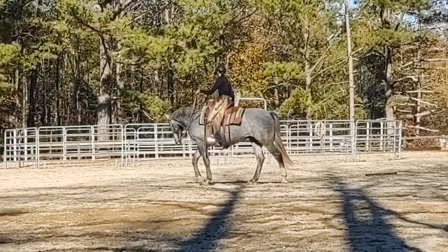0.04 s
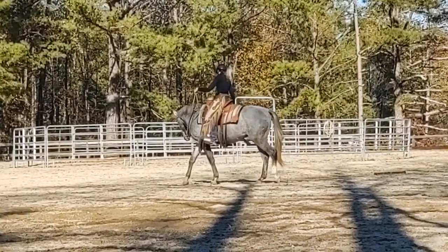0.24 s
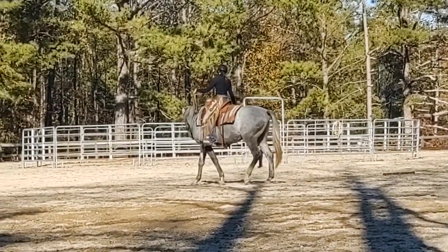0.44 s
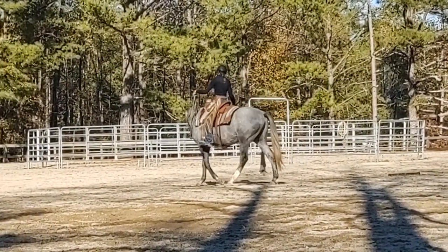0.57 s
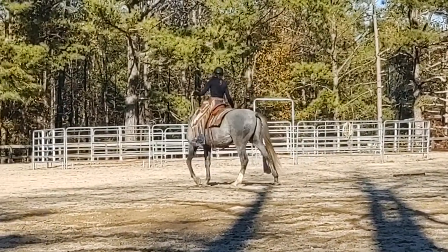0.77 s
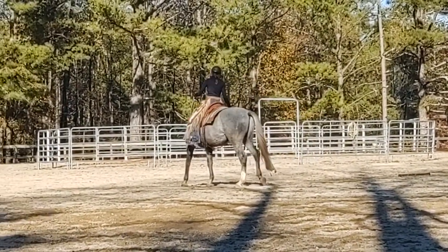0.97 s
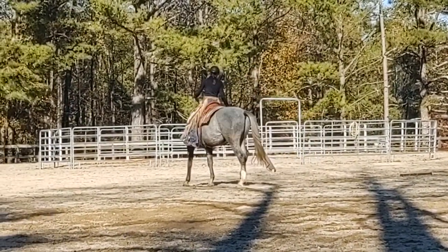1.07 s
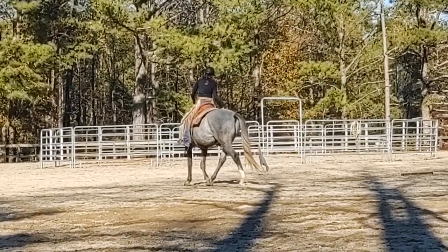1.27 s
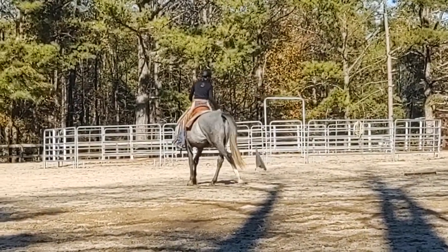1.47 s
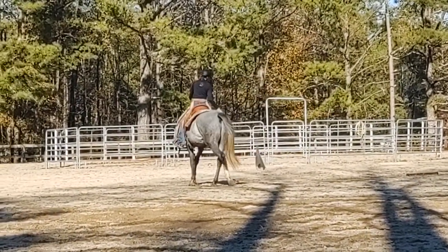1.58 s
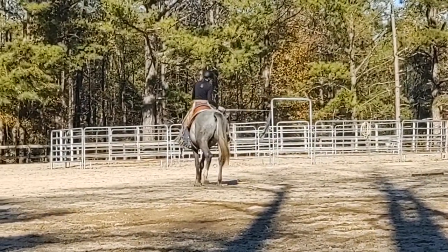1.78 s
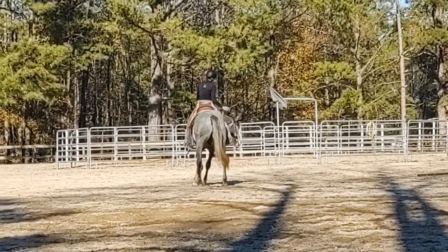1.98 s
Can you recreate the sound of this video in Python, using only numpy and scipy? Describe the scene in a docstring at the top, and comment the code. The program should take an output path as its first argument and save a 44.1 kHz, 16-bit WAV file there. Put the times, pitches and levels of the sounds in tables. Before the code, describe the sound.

Soft, low, irregular wind thumps buffet the left microphone throughout, strongest around 0.85-1.0 and 1.53 seconds, fading after 1.8. A distant engine hum slides down in pitch, loudest near 1.0-1.2, with faint roar and low rumble. Tack ticks at 0.14; faint sand scuffs come mostly before 0.5. A bird chips at 0.77, echoing in trees. Hoof knocks, right, at 0.87 and 1.37, the second clickier. Quiet leafy hiss.

```python
"""Soft low thumps of a light breeze on the left of two hand-held microphones, in a sandy outdoor arena.
An engine passes about 22 m off, its hum falling in pitch over a faint roar; a weak low rumble lies under it.
A hoof knocks twice, sand is scuffed, tack ticks, a bird chips once and the trees hiss softly.
Gusts and rumble are filtered random kicks, the hum a gliding sine with its octave, roar and hiss filtered
noise; knocks and tick are dying sines, scuffs grainy noise, the chip a rising sine with scattered echoes."""
import sys
import numpy as np
from scipy import signal
from scipy.io import wavfile
from scipy.ndimage import uniform_filter1d

SR = 44100
rng = np.random.default_rng(int(sys.argv[2]) if len(sys.argv) > 2 else 0)


def transcribe(u):
    """Save the signal u as a 16-bit wav file named by the first command-line argument.

    u: samples, shape (n,) or (channels, n), limited to [-1, 1]; the rate is SR.
    q: integer samples, one column per channel.
    """
    v = np.clip(np.atleast_2d(u).T, -1, 1)
    q = np.round(v * 32767).astype(np.int16)
    wavfile.write(sys.argv[1], SR, q)


N = 89478

# Gusts at the left microphone, before its port: [t/s, level/dB, upper over lower thump/dB]
GUSTS = [(0, -65.5, -17), (.06, -46.5, 3), (.085, -51.5, -10), (.097, -38.5, -6.5), (.127, -42.5, 8),
         (.168, -50.5, -1), (.19, -37, 11.5), (.23, -53, 0), (.27, -40, -2), (.3, -53.5, -27),
         (.36, -61, -11), (.44, -64, -19), (.47, -52, 1), (.49, -37.5, 5.5), (.515, -48, 7),
         (.535, -50, -9), (.62, -54.5, -12), (.67, -47, -1.5), (.72, -63.5, -14), (.745, -42, 0),
         (.78, -61.5, 32), (.838, -58, -6), (.85, -34.5, -2), (.885, -42.5, -3.5), (.92, -34, 3),
         (.965, -34.5, -2), (.98, -42.5, 4.5), (1.08, -47.5, -8), (1.11, -40, 2), (1.135, -48, 1),
         (1.18, -37, -2.5), (1.24, -59.5, 5), (1.31, -53.5, 4), (1.33, -45.5, -7), (1.36, -36, -18),
         (1.39, -51.5, -27), (1.435, -47, 5), (1.517, -49.5, -3), (1.528, -31.5, 1.5), (1.575, -40, -7.5),
         (1.6, -59, -4), (1.63, -43, -2), (1.67, -50.5, -11), (1.765, -52.5, -3), (1.782, -41, -5.5),
         (1.81, -73, 10), (2.03, -62.5, 2)]
# Gritty puffs on top of the sharpest gusts: [t/s, length/s, level/dB]
PUFFS = [(.18, 0.026, -66), (1.525, .07, -63.5)]
# Loudness of the engine's hum, wavering through the air: [t/s, level/dB]
HUM = [(0, -56), (.21, -53), (.3, -62), (.42, -60), (.56, -63), (.75, -56), (.88, -56), (.93, -56),
       (1.04, -48), (1.13, -51.5), (1.2, -48), (1.3, -54.5), (1.36, -49.5), (1.41, -55), (1.52, -54),
       (1.64, -62), (1.8, -64), (2.03, -71)]
# Roar of the passing engine: [t/s, level/dB]
ROAR = [(0, -72.5), (.6, -75), (.85, -75.5), (.95, -69), (1.2, -69), (1.3, -75.5), (1.6, -74.5),
        (2.03, -84.5)]
# Weak low rumble heard at both microphones, perhaps the distant engine: [t/s, level/dB]
RUMBLE = [(0, -64.5), (.12, -58.5), (.3, -63.5), (.45, -61.5), (.6, -72), (.75, -65.5), (.9, -59),
          (1.0, -63), (1.08, -55.5), (1.15, -56), (1.22, -59.5), (1.3, -58), (1.5, -63), (1.58, -54.5),
          (1.7, -60), (1.85, -61.5), (2.03, -68)]
# Hoof knocks at the right microphone: [t/s, thud level/dB, click level/dB]
KNOCKS = [(0.874, -49, -73), (1.3684, -53, -42)]
# Sand scuffs at the right microphone: [t/s, length/s, level/dB]
SCUFFS = [(.0, 0.049, -77.5), (0.146, 0.025, -70.5), (0.25, 0.029, -75), (0.372, 0.089, -72.5),
          (1.675, 0.024, -79)]
# Modes of the ticking tack: [f/Hz, left level/dB, right level/dB, t60/s]
TACK = [(2300, -67, -60, .015), (3300, -66, -63, .016), (4150, -58, -62, .015), (6950, -45, -43, .005),
        (10500, -47, -38, .004), (11800, -82, -72, .09), (10150, -79, -71, .1)]
# Spectrum of the hiss of trees and air, relative to AIR_DB: [f/Hz, left level/dB, right level/dB]
AIR = [(225, 2, 7.5), (422, -4, -2), (673, 1.5, -1), (894, -6, -6), (1610, -6, -10), (2005, -11.5, -10),
       (2650, -13, -38), (3550, -8, -15.5), (5000, -12, -19), (5650, -6, -21), (6790, -14, -16),
       (7980, -17, -19), (9500, -20, -10.5), (9840, -24, -16), (10970, -21, -17.5), (14300, -24.5, -24)]

# Random kicks of gusts and rumble: band edges, and how far chance swells are levelled (0 to 1)
LOW_HZ, SPLIT_HZ, HIGH_HZ, EDGE_HZ, EDGE_DB = 64.7, 123.3, 217.7, 351, -15.5
KICKS_PER_S, EVENING, EVEN_S = 600, 0.86, 0.03

# Gusts: microphone port and top of the puffs
PORT_CUT_HZ, PUFF_HIGH_HZ = 378, 610

# Engine: distance is at the closest point of its straight path
ENGINE_HZ, SPEED_M_S, DISTANCE_M, CLOSEST_S = 168.44, 26, 22.43, 1.05
OCTAVE_DB, OCTAVE_WAVER_DB, HUM_ROUGH_RAD = -26.5, 3, .06
ROAR_LOW_HZ, ROAR_HIGH_HZ, RIGHT_LAG_S = 395, 1610, 0.00033

# Rumble: left level relative to the right, and upper over lower band
RUMBLE_LEFT_DB, RUMBLE_BRIGHT_DB = -2, -4

# Hoof and sand: left levels are relative to the right
THUD_HZ, THUD_T60_S, KNOCK_LEFT_DB = 267, 0.083, -13
CLICK_HZ, CLICK_T60_S = 1200, .0026
SCUFF_LOW_HZ, SCUFF_HIGH_HZ, SCUFF_LEFT_DB = 2600, 11700, -21.5

# Tack
TICK_S, TICK_RISE_S, TICK_LEFT_LAG_S = .1419, .001, .0005
SNAP_DB, SNAP_T60_S = -63, .018

# Bird: the pitch heads toward CHIP_TOWARD_HZ with time constant CHIP_RISE_S
CHIP_S, CHIP_LENGTH_S, CHIP_DB, CHIP_LEFT_DB = .7655, .025, -64.5, -3
CHIP_FROM_HZ, CHIP_TOWARD_HZ, CHIP_RISE_S = 6450, 8600, .015
ECHO_DB, ECHO_T60_S, NEAR_ECHO_DB, NEAR_ECHO_S = 0, .38, -3, .011

# Background hiss, and the limits of the microphones
AIR_DB, AIR_PATCHY_DB = -57, 1.53
LOW_CUT_HZ, CUTOFF_HZ = 44, 15650


def amp(db):
    """Decibels to gain."""
    return 10 ** (np.asarray(db) / 20)


def rms_one(x):
    """Scale to unit rms."""
    return x / np.sqrt(np.mean(x ** 2, axis=-1, keepdims=True) + 1e-20)


def in_time(rows):
    """Columns of a table joined by straight lines in time."""
    s, *columns = np.transpose(rows)
    return [np.interp(np.arange(N) / SR, s, column) for column in columns]


def band(x, low_hz, high_hz, order=2):
    """Butterworth band-pass."""
    edges_hz = [low_hz, min(high_hz, .45 * SR)]
    return signal.sosfilt(signal.butter(order, edges_hz, "band", fs=SR, output="sos"), x)


def drift(rate_hz):
    """Slow random wander of spread 1: twice-smoothed noise, drawn every 40 samples."""
    r = np.exp(-2 * np.pi * rate_hz * 40 / SR)
    # the first 2000 steps let the smoothing settle
    slow = signal.lfilter([1], [1, -2 * r, r * r], rng.standard_normal(N // 40 + 2002))[2000:]
    return np.interp(np.arange(N) / 40, np.arange(len(slow)), rms_one(slow - slow.mean()))


def ring(s, hz, t60):
    """A sine of unit starting height, struck at time s and dying away by 60 dB in t60."""
    t = np.maximum(np.arange(N) / SR - s, 0)
    return np.sin(2 * np.pi * hz * t) * amp(-60 * t / t60)


def swells(rows):
    """A smooth half-sine swell for each row of start, length and level."""
    t = np.arange(N) / SR
    return sum(amp(db) * np.sin(np.pi * np.clip((t - s) / length, 0, 1)) for s, length, db in rows)


def late(x, lag_s):
    """Delay by a fraction of a millisecond."""
    return np.interp(np.arange(N) - lag_s * SR, np.arange(N), x)


def low_kicks(brightness_db):
    """Random kicks filtered to a low band, a higher band and a weak upper edge."""
    # one extra second ahead lets the filters settle
    kicks = (rng.random(N + SR) < KICKS_PER_S / SR) * rng.standard_normal(N + SR) + 1e-9
    low = rms_one(band(kicks, LOW_HZ, SPLIT_HZ)[SR:])
    high = rms_one(band(kicks, SPLIT_HZ, HIGH_HZ, order=3)[SR:])
    edge = rms_one(band(kicks, HIGH_HZ, EDGE_HZ, order=3)[SR:])
    upper = evened(high + amp(EDGE_DB) * edge)
    # the divisor keeps the power steady as brightness changes
    return (evened(low) - amp(brightness_db) * upper) / np.sqrt(1 + amp(2 * brightness_db))


def evened(x):
    """Noise with its chance swells partly levelled by dividing by its smoothed power."""
    power = uniform_filter1d(x ** 2, int(EVEN_S * SR))
    power = uniform_filter1d(power, int(EVEN_S * SR / 2))
    return rms_one(x / (power + 0.012) ** (EVENING / 2))


def gusts():
    """Wind on the left microphone only: pressure kicks through its port, with gritty puffs on top."""
    gust_db, brightness_db = in_time(GUSTS)
    port = signal.butter(3, PORT_CUT_HZ, fs=SR, output="sos")
    thumps = signal.sosfilt(port, amp(gust_db) * low_kicks(brightness_db))
    grit = rms_one(band(rng.standard_normal(N), HIGH_HZ, PUFF_HIGH_HZ))
    return np.array([thumps + swells(PUFFS) * grit, np.zeros(N)])


def engine():
    """Hum and roar of an engine driving past: the pitch falls as approach turns to retreat."""
    along_m = SPEED_M_S * (np.arange(N) / SR - CLOSEST_S)
    receding_m_s = SPEED_M_S * along_m / np.hypot(along_m, DISTANCE_M)
    hz = ENGINE_HZ / (1 + receding_m_s / 343)  # Doppler shift, speed of sound 343 m/s
    phase = 2 * np.pi * np.cumsum(hz) / SR + HUM_ROUGH_RAD * drift(5.5) + rng.uniform(0, 2 * np.pi)
    octave = amp(OCTAVE_DB + OCTAVE_WAVER_DB * drift(8.7)) * np.sin(2 * phase)
    hum = np.sqrt(2) * amp(in_time(HUM)[0]) * (np.sin(phase) + octave)
    roar = amp(in_time(ROAR)[0]) * rms_one(band(rng.standard_normal(N), ROAR_LOW_HZ, ROAR_HIGH_HZ))
    sound = hum + roar
    return np.array([sound, late(sound, RIGHT_LAG_S)])


def rumble():
    """Weak low rumble, perhaps the distant engine: the same random kicks at both microphones."""
    sound = amp(in_time(RUMBLE)[0]) * low_kicks(RUMBLE_BRIGHT_DB)
    return np.array([amp(RUMBLE_LEFT_DB) * sound, sound])


def knocks():
    """A hoof's dull push into the sand, a dying low sine, with a short click on top."""
    sound = np.zeros(N)
    for s, thud_db, click_db in KNOCKS:
        sound -= amp(thud_db) * ring(s, THUD_HZ, THUD_T60_S)
        sound += amp(click_db) * ring(s, CLICK_HZ, CLICK_T60_S)
    return np.array([amp(KNOCK_LEFT_DB) * sound, sound])


def scuffs():
    """Brief sprays of sand: grainy bright noise under a smooth swell."""
    grains = rng.standard_normal((2, N)) * (1 + rng.exponential(1, N))
    spray = rms_one(band(grains, SCUFF_LOW_HZ, SCUFF_HIGH_HZ))
    return amp([[SCUFF_LEFT_DB], [0]]) * swells(SCUFFS) * spray


def tick():
    """One tick of a small metal fitting, rising within a millisecond: a few modes and a broad snap."""
    since_s = np.arange(N) / SR - TICK_S
    rise = np.clip(since_s / TICK_RISE_S, 0, 1) ** 2
    modes = sum(amp([[left_db], [right_db]]) * ring(TICK_S, hz, t60) for hz, left_db, right_db, t60 in TACK)
    left, right = rise * modes
    dying = amp(SNAP_DB - 60 * np.maximum(since_s, 0) / SNAP_T60_S)
    # the snap shares the band and left-right balance of the scuffs
    snap = rise * dying * rms_one(band(rng.standard_normal((2, N)), SCUFF_LOW_HZ, SCUFF_HIGH_HZ))
    return np.array([late(left, TICK_LEFT_LAG_S), right]) + amp([[SCUFF_LEFT_DB], [0]]) * snap


def bird():
    """A short rising chip, blurred by near branches and scattered back by the trees as a dying smear."""
    t = np.clip(np.arange(N) / SR - CHIP_S, 0, CHIP_LENGTH_S)
    hz = CHIP_TOWARD_HZ - (CHIP_TOWARD_HZ - CHIP_FROM_HZ) * np.exp(-t / CHIP_RISE_S)
    swell = np.sin(np.pi * (t / CHIP_LENGTH_S) ** 0.73)
    chip = swell * np.sin(2 * np.pi * np.cumsum(hz) / SR)
    lags = np.arange(SR // 3) / SR
    # sparse dying reflections, one lag in ten, scaled to unit energy on each side
    reflects = rng.random((2, len(lags))) < .1
    trunks = rng.standard_normal((2, len(lags))) * reflects * amp(-60 * lags / ECHO_T60_S)
    trunks /= np.sqrt(np.sum(trunks ** 2, axis=1, keepdims=True))
    branches = rng.standard_normal(trunks.shape) * (lags < NEAR_ECHO_S) / np.sqrt(NEAR_ECHO_S * SR)
    echoes = amp(ECHO_DB) * trunks + amp(NEAR_ECHO_DB) * branches
    scattered = signal.fftconvolve(chip[None], echoes, axes=1)[:, :N]
    return amp([[CHIP_DB + CHIP_LEFT_DB], [CHIP_DB]]) * (chip + scattered)


def air():
    """Hiss of trees and air: fifth-octave bands of unrelated noise on each side, gently patchy."""
    hz, left_db, right_db = np.transpose(AIR)
    edges_hz = 200 * 2 ** np.arange(0, 6.5, .2)
    white = rng.standard_normal((2, 2, N))  # two stereo noises, so neighbouring bands are unrelated
    together = drift(3.8)
    hiss = np.zeros((2, N))
    for k, (low, high) in enumerate(zip(edges_hz, edges_hz[1:])):
        log_centre = np.log(low * high) / 2
        level_db = [[np.interp(log_centre, np.log(hz), side_db)] for side_db in (left_db, right_db)]
        patches_db = AIR_PATCHY_DB * (0.48 * together + drift(23))
        hiss += amp(level_db + patches_db) * band(white[k % 2], low, high)
    return amp(AIR_DB) * hiss


def scene():
    """All sources at the two microphones."""
    return gusts() + engine() + rumble() + knocks() + scuffs() + tick() + bird() + air()


def record(dry):
    """The microphones roll off the deep bass; the top is cut steeply."""
    thin = signal.sosfilt(signal.butter(2, LOW_CUT_HZ, "high", fs=SR, output="sos"), dry)
    return signal.sosfilt(signal.ellip(12, .5, 60, CUTOFF_HZ, fs=SR, output="sos"), thin)


dry = scene()
out = record(dry)
transcribe(out)
```